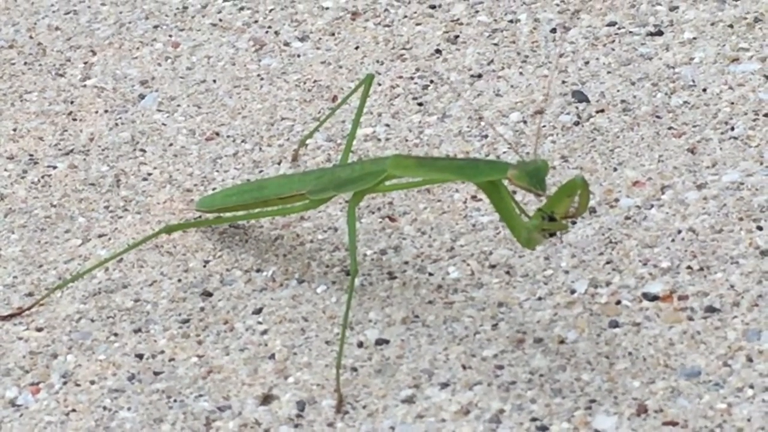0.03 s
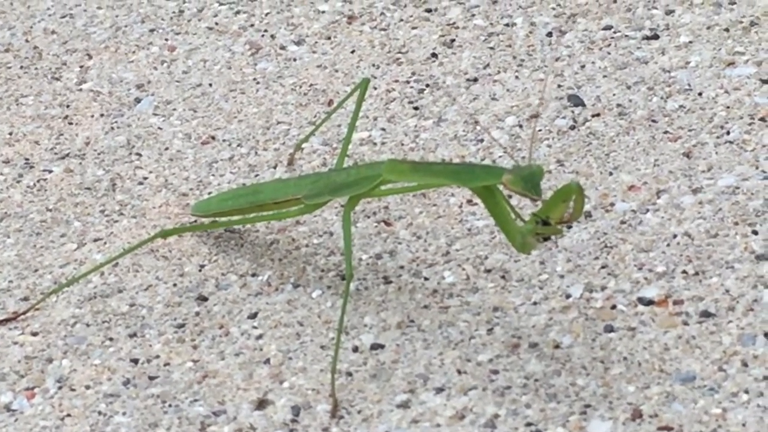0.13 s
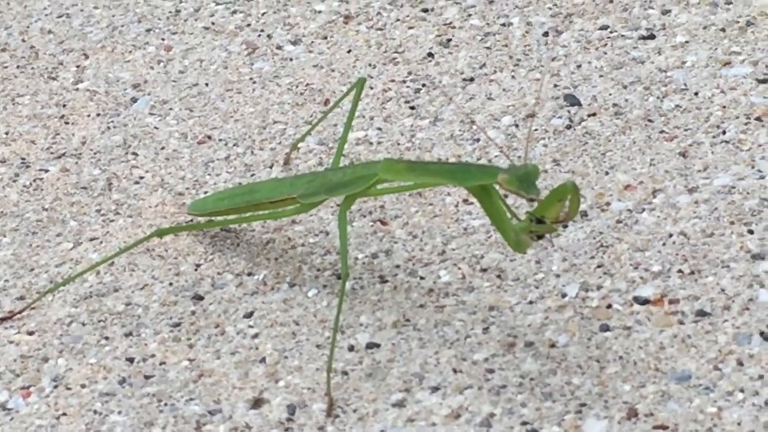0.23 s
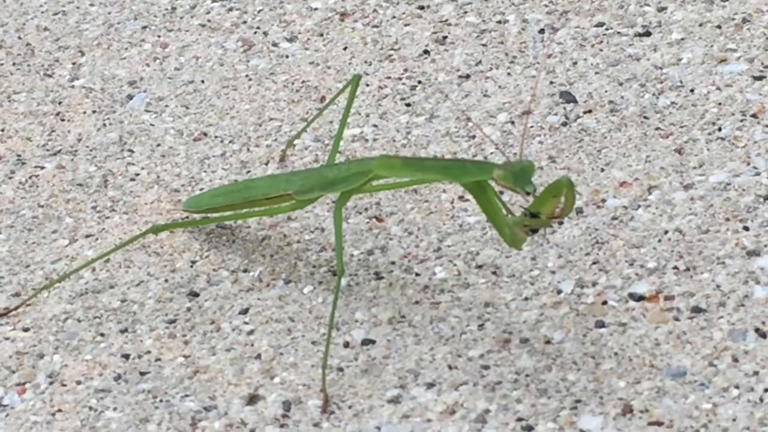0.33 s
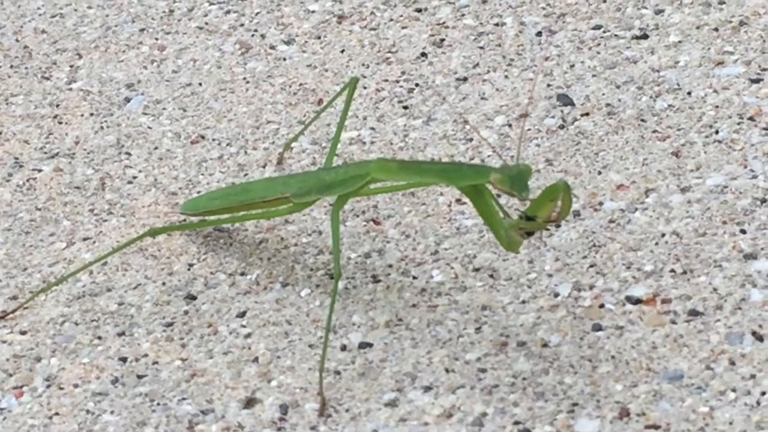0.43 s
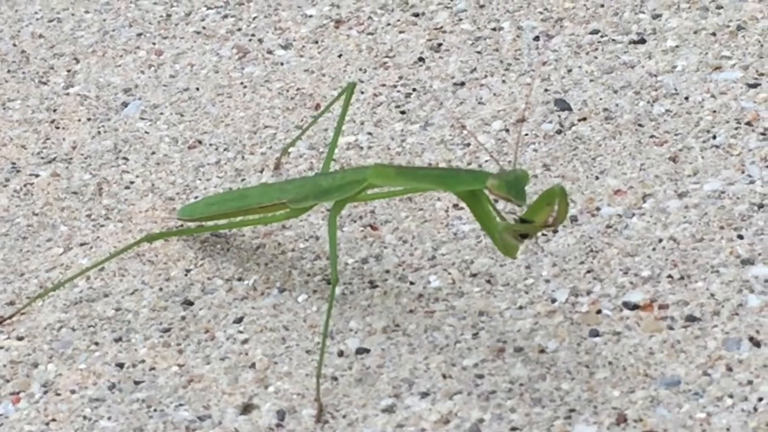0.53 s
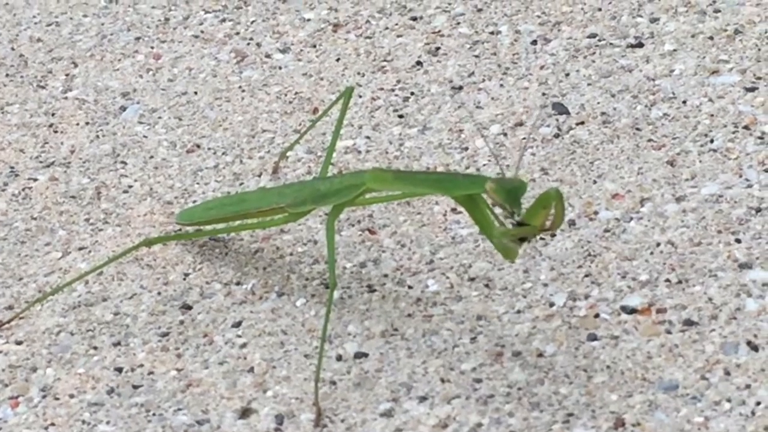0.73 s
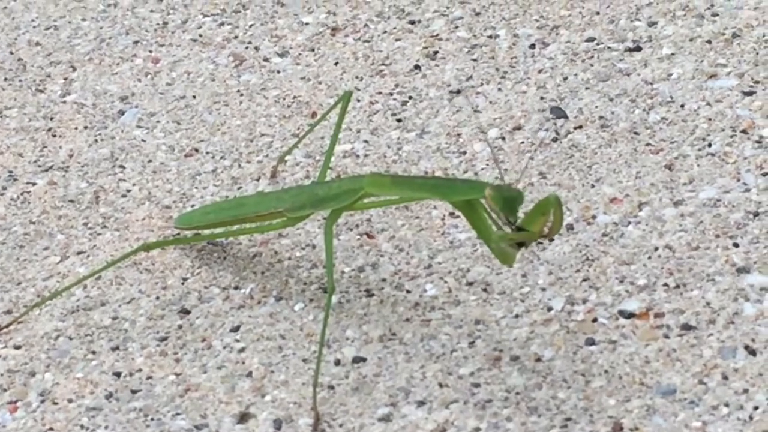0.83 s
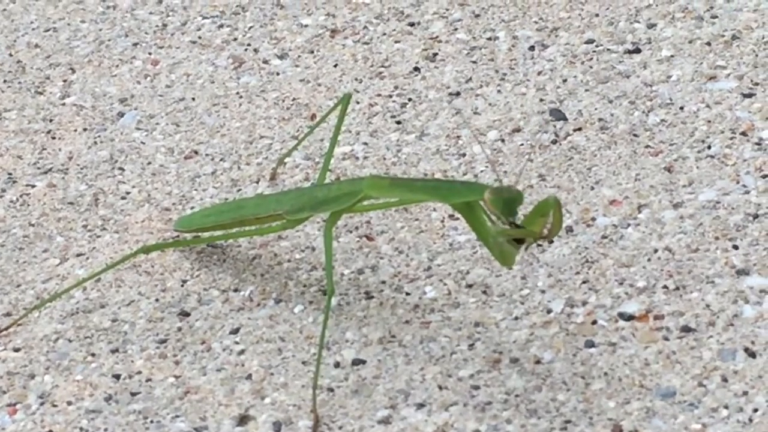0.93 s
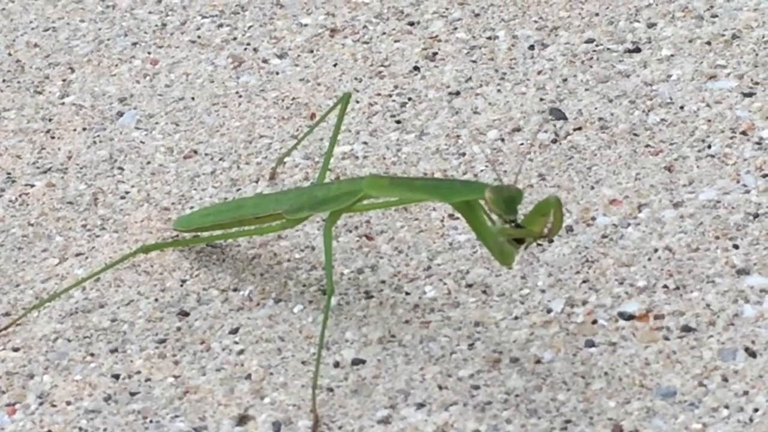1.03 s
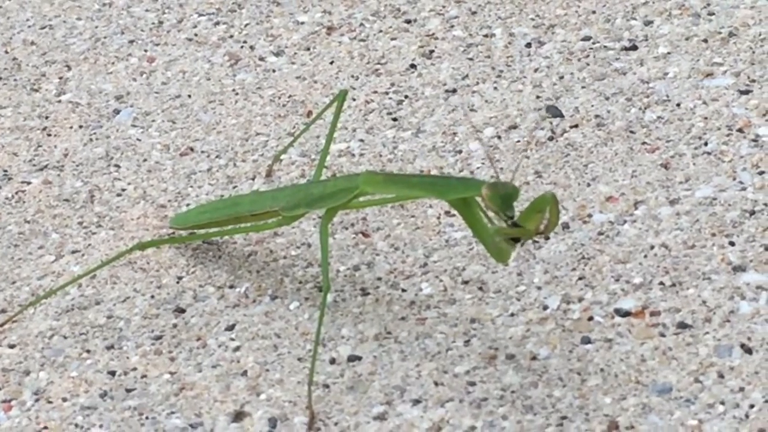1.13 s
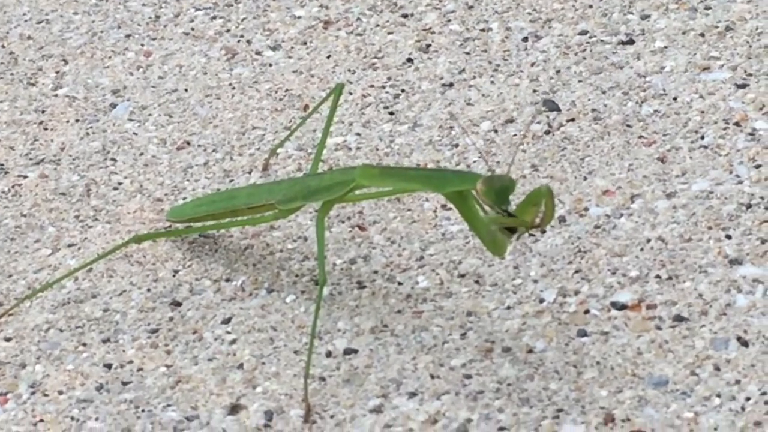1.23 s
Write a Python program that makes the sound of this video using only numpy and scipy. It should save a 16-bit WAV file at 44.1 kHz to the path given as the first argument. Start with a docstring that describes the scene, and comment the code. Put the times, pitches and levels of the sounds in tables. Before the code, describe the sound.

A light breeze rumbles and thumps once against the microphone, with faraway traffic behind.

```python
"""A sidewalk in a light breeze, with the steady wash of distant traffic behind it.
Air moving over the microphone makes a low rumble. One puff hits it squarely with a dull thump,
a short train of eddies in churning air; weak puffs, each a single slow eddy, mostly come after it.
Three tiny, high ticks sound close by."""
import sys
import numpy as np
from scipy import signal
from scipy.fft import rfft, irfft
from scipy.io import wavfile

SR = 44100
rng = np.random.default_rng(int(sys.argv[2]) if len(sys.argv) > 2 else 0)


def wrap_up_sound(samples):
    """Save the sound to the file named by the first command line argument, as 16-bit audio."""
    columns = np.atleast_2d(samples).T
    # keep every value between -1 and 1, then stretch to whole-number steps
    tamed = np.clip(columns, -1, 1)
    steps = np.round(tamed * 32767).astype(np.int16)
    wavfile.write(sys.argv[1], SR, steps)


N = 57330
T = np.arange(N) / SR
LOG_HZ = np.log(np.fft.rfftfreq(N, 1 / SR) + 1)


def amp(db):
    """Decibels to gain."""
    return 10 ** (np.asarray(db) / 20)


def unit(x):
    """Scales to rms 1."""
    return x / np.sqrt(np.mean(x ** 2) + 1e-20)


def noise(spectrum):
    """Noise of rms 1, shaped by a (frequency [Hz], level [dB]) table."""
    hz, db = np.transpose(spectrum)
    gain = amp(np.interp(LOG_HZ, np.log(hz), db))
    return unit(irfft(rfft(rng.standard_normal(N)) * gain, N))


def steadied(x, span_s):
    """Evens out the swings of level that are slower than span_s."""
    window = signal.windows.hann(max(int(span_s * SR), 8))
    power = signal.fftconvolve(x ** 2, window / window.sum(), "same")
    return x / np.sqrt(abs(power) + 1e-9)


def drift(top_hz):
    """A slow random curve of rms 1."""
    rates = np.geomspace(top_hz / 10, top_hz, num=20)[:, None]
    return unit(np.sin(2 * np.pi * (rates * T + rng.random(rates.shape))).sum(0))


# Distant traffic and air hiss, heard from the sidewalk (frequency [Hz], relative level [dB])
TRAFFIC_SPECTRUM = [(30, -23.5), (100, 0), (200, 0.5), (330, -2), (500, -3), (750, -5), (1000, -4),
                    (1350, -8), (2000, -10), (2600, -20.5), (3500, -27), (4900, -36), (5500, -34),
                    (7000, -38.5), (10300, -42.5), (12000, -43.5), (14500, -46.5), (16000, -41.5)]
# Rise and fall of that far wash around 790 Hz (time [s], relative level [dB])
TRAFFIC_MIDRANGE = [(0, 1), (.15, 0), (.33, -3), (.45, 1), (.58, -1), (.67, 2), (.74, -2.5), (.81, 1),
                    (.92, 2), (1.03, 0), (1.15, .5), (1.3, -.5)]

def traffic():
    """Far traffic blends into a wash: its midrange swells and each band wavers a little on its own."""
    wash = rfft(noise(TRAFFIC_SPECTRUM))
    centres_hz = np.geomspace(250, 12000, num=16)
    midrange_db = np.interp(T, *np.transpose(TRAFFIC_MIDRANGE))
    midrange_hz, midrange_octaves = 790, 1.1
    out = np.zeros(N)
    for hz, share in zip(centres_hz, np.eye(len(centres_hz))):
        band = irfft(wash * np.interp(LOG_HZ, np.log(centres_hz), share), N)
        waver_db = (1.5 if hz < 4000 else .5) * drift(top_hz=11.82)  # the hiss wavers less than the body
        midrange_weight = np.exp(-(np.log2(hz / midrange_hz) / midrange_octaves) ** 2)
        out += band * amp(waver_db + midrange_db * midrange_weight)
    return amp(-48) * out


# Wind rumble right on the microphone (frequency [Hz], relative level [dB])
RUMBLE_SPECTRUM = [(10, -29), (30, -7.5), (55, 1), (80, -0.5), (150, -1), (230, -6), (350, -15),
                   (700, -42.5), (2000, -76.5)]
# Strength of the breeze at the microphone (time [s], relative level [dB])
BREEZE_STRENGTH = [(0, 2), (.16, -2), (.3, 2.5), (.43, -0.5), (.49, 4.5), (.58, 1), (.7, -0.5), (.78, 3),
                   (.86, 1), (.95, -2.5), (1.02, -2), (1.13, -2.5), (1.3, -3.5)]

def breeze():
    """Lumpy low rumble that follows the air moving over the microphone."""
    strength_db = np.interp(T, *np.transpose(BREEZE_STRENGTH))
    lumps_db = -.4 * drift(top_hz=16)
    rumble = steadied(noise(RUMBLE_SPECTRUM), span_s=.05)
    return amp(-46 + strength_db + lumps_db) * rumble


# Weak puffs brushing the microphone, plus the low push of the head-on puff near .248 s (time [s], envelope peak
# level [dB], pitch [Hz])
WEAK_PUFFS = [(0.06, -32, 76), (0.116, -37.5, 83.4), (.24, -22.5, 161), (.248, -23.5, 69), (.279, -32, 106),
              (0.335, -32, 86), (0.382, -29, 133.4), (0.474, -33.5, 56.3), (0.651, -36.5, 74),
              (0.732, -39.5, 58.6), (.882, -40, 100), (1.072, -36, 97), (1.241, -38, 65.5),
              (1.288, -37.5, 71)]

def puffs():
    """Each row is one slow eddy that rocks the pressure at the microphone once or twice."""
    out = np.zeros(N)
    for (at_s, db, hz), phase in zip(WEAK_PUFFS, rng.random(len(WEAK_PUFFS))):
        cycles = (T - at_s) * hz
        out += amp(db) * np.exp(-cycles ** 2) * np.cos(2 * np.pi * (cycles + phase))
    return out


# Tiny ticks close to the microphone (time [s], peak level [dB])
CLOSE_TICKS = [(0.1646, -51), (.196, -45), (.6955, -59)]
# A faint, brief high hiss trailing each tick (frequency [Hz], relative level [dB])
TICK_TAIL_SPECTRUM = [(1000, -31), (5000, -6), (9000, -3.5), (12000, 0), (14500, 3), (16000, -13)]

def ticks(pitch_hz=12700, width_s=.00012, tail_decay_s=.014):
    """Each nearby tick is a few cycles of very high treble, trailed by a faint, brief high hiss."""
    tail_hiss = amp(-29.5) * noise(TICK_TAIL_SPECTRUM)
    out = np.zeros(N)
    for at_s, db in CLOSE_TICKS:
        age = T - at_s
        snap = np.exp(-.5 * (age / width_s) ** 2) * np.cos(2 * np.pi * pitch_hz * age)
        tail = tail_hiss * (age > 0) * np.exp(-abs(age) / tail_decay_s)
        out += amp(db) * (snap + tail)
    return out


# Turbulence of the puff that hits the microphone head-on (frequency [Hz], relative level [dB])
CHURN_SPECTRUM = [(20, -37), (70, -6.5), (130, -5), (230, 9.5), (320, -8.5), (420, -1.5), (490, -8.5),
                  (590, -11.5), (760, -31), (1500, -49.5), (3000, -84)]

def thump(peak_s=.224, eddies_per_s=111.4, eddy_width_s=.0011, slowing_s=.00038, port_hz=55):
    """Eddies roll over the microphone port ever more slowly, each a brief suction, amid churning air."""
    def force(t, rise_s, fall_s=.011, lead_s=.037, onset_s=.0081):
        """The puff sets in lead_s before its peak, grows and dies away."""
        onset = np.clip((t - peak_s + lead_s) / onset_s, 0, 1)
        return onset * np.exp(-np.maximum((peak_s - t) / rise_s, (t - peak_s) / fall_s))

    eddy_index = np.arange(-4, 6)  # eddy 0 arrives at the peak
    jitter = .0085 * rng.standard_normal(len(eddy_index))
    lag_s = slowing_s * eddy_index ** 2  # the gaps widen as the puff spends itself
    suction = np.zeros(N)
    for at_s in peak_s + (eddy_index + jitter) / eddies_per_s + lag_s:
        suction -= force(at_s, rise_s=.015) * np.exp(-.5 * ((T - at_s) / eddy_width_s) ** 2)
    port_low_cut = signal.butter(2, port_hz, "highpass", fs=SR, output="sos")
    eddies = signal.sosfilt(port_low_cut, suction)
    churn = force(T, rise_s=.022) * steadied(noise(CHURN_SPECTRUM), span_s=.0087)
    return amp(-6) * eddies + amp(-26.5) * churn


def scene():
    """Far traffic, wind and close ticks at one microphone on the sidewalk."""
    return (traffic() + breeze() + puffs() + thump() + ticks())[None]


def record(dry):
    """The recorder cuts the treble steeply above 15.3 kHz."""
    taps = signal.firwin(511, 15300, window=("kaiser", 9), fs=SR)
    return signal.oaconvolve(dry, taps[None], "same")


dry = scene()
out = record(dry)
wrap_up_sound(out)
```